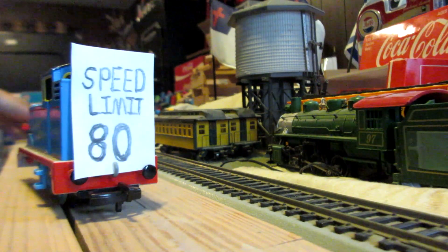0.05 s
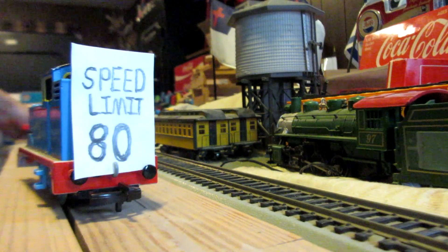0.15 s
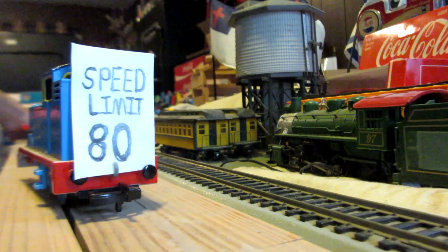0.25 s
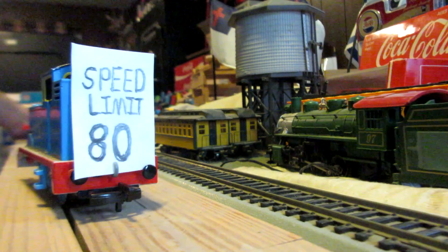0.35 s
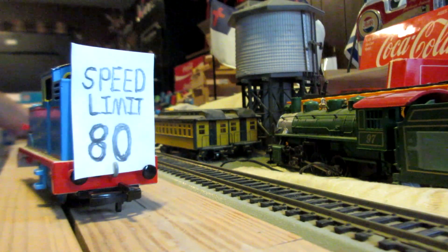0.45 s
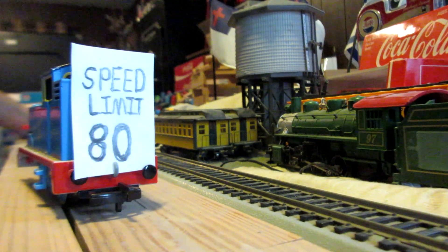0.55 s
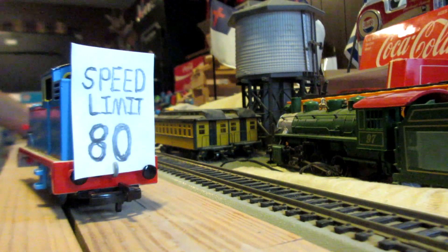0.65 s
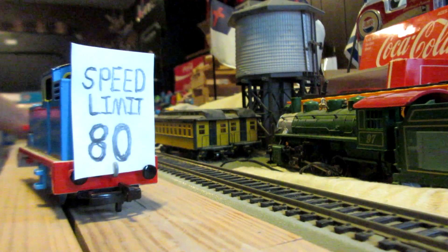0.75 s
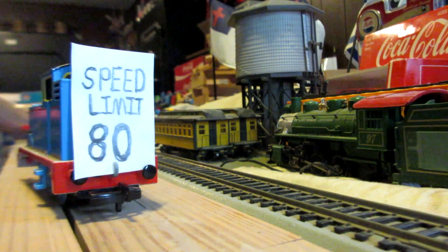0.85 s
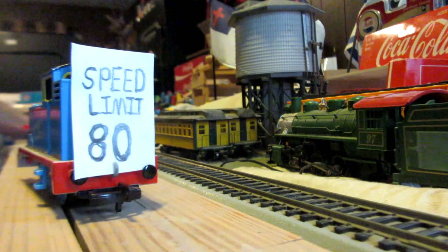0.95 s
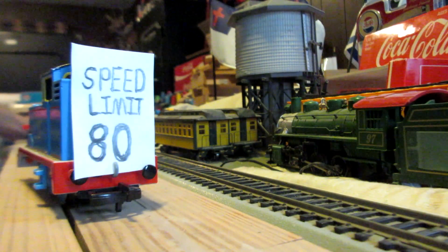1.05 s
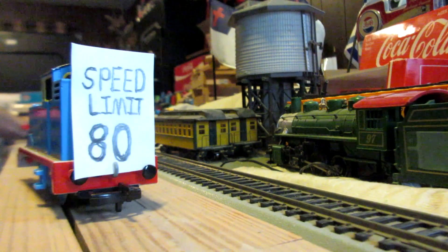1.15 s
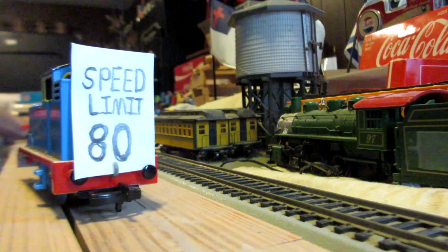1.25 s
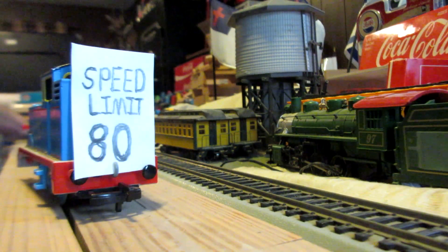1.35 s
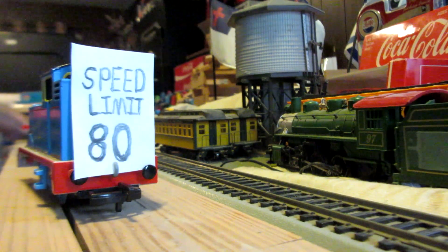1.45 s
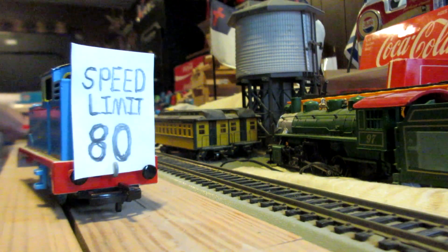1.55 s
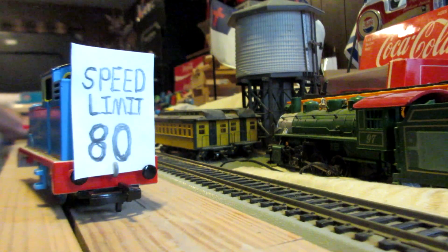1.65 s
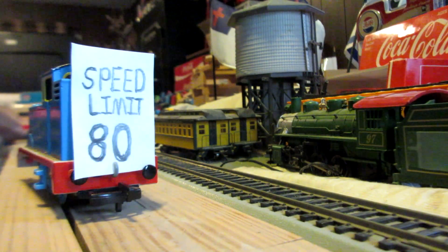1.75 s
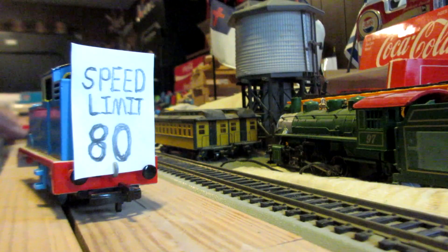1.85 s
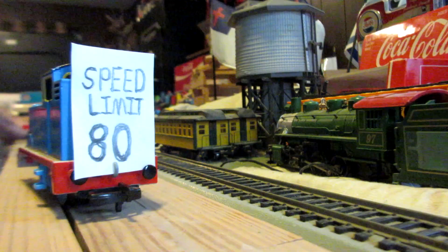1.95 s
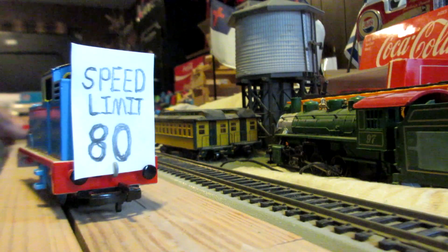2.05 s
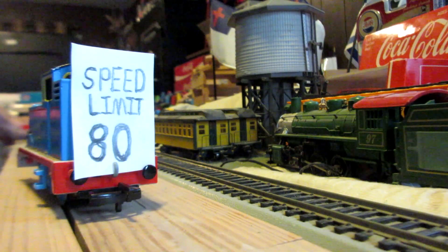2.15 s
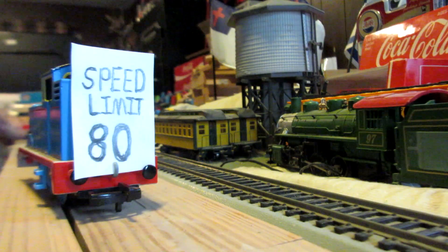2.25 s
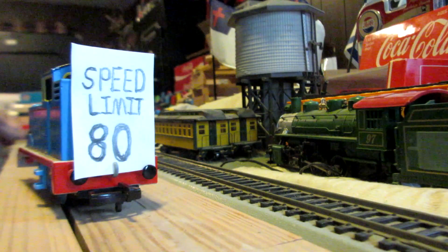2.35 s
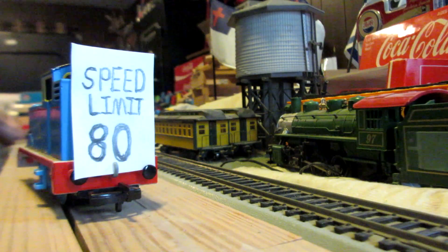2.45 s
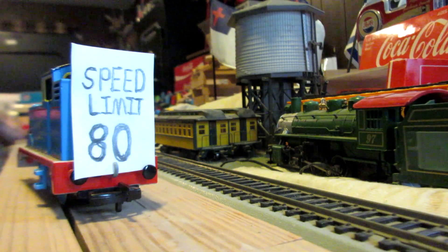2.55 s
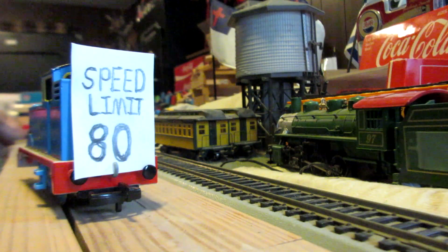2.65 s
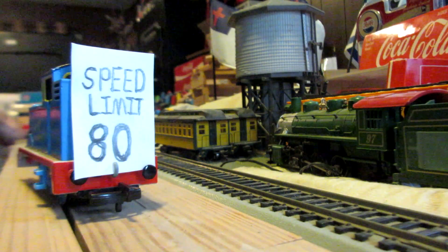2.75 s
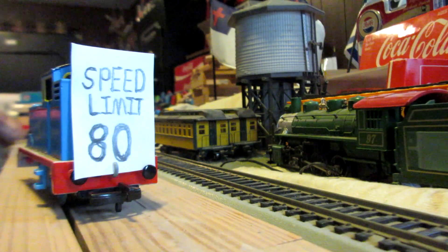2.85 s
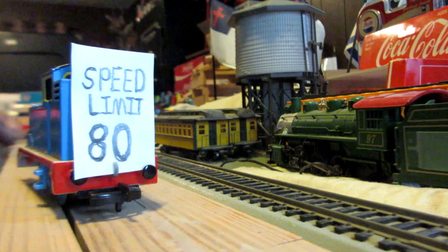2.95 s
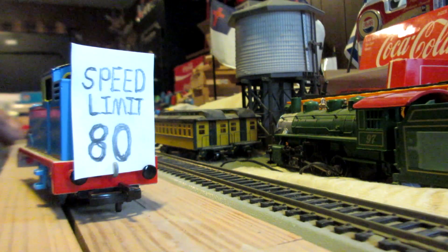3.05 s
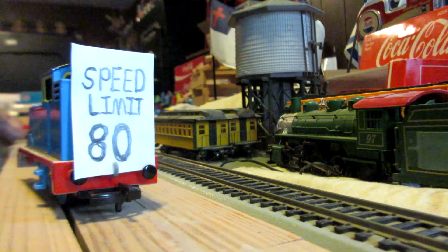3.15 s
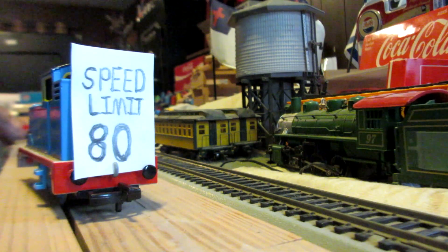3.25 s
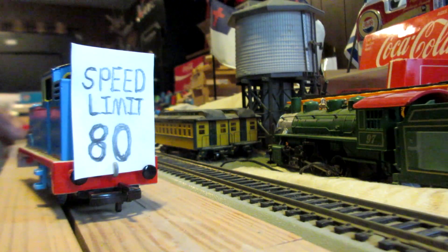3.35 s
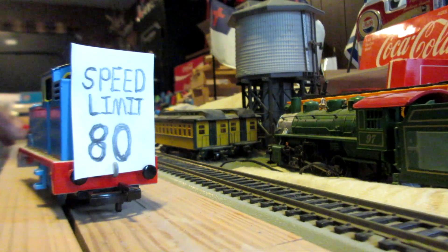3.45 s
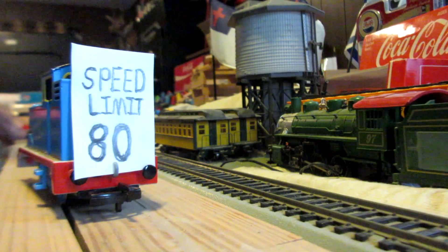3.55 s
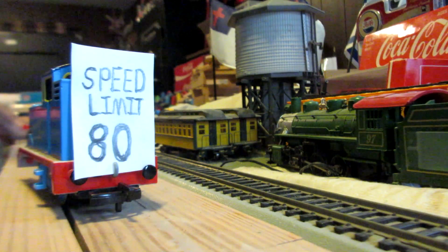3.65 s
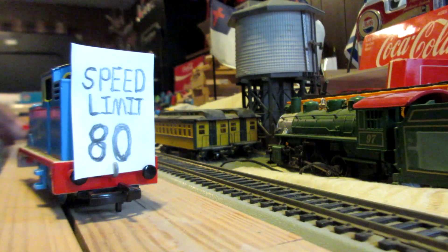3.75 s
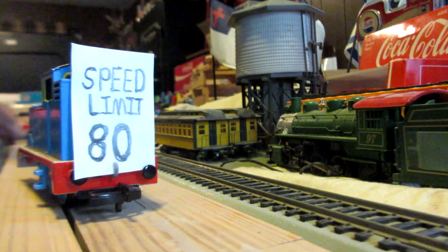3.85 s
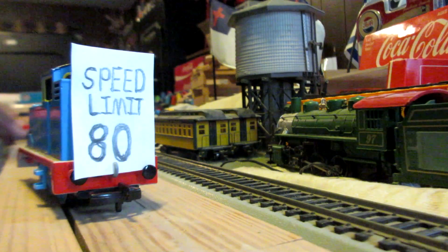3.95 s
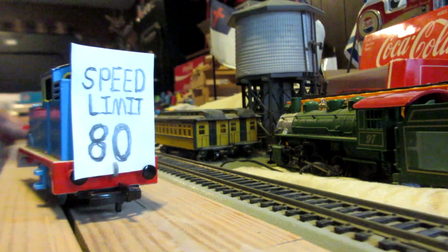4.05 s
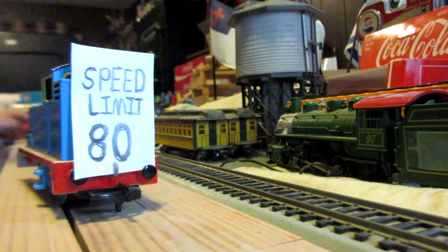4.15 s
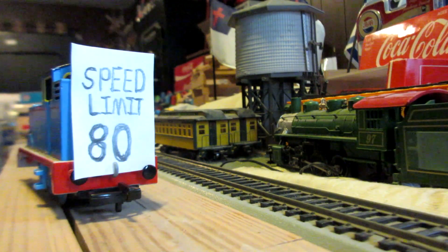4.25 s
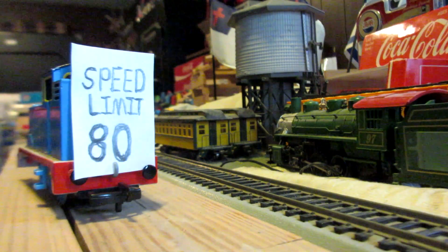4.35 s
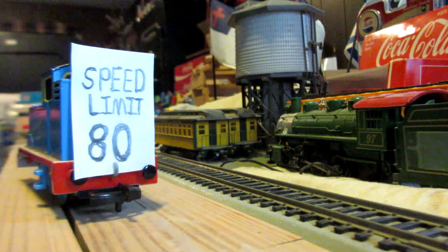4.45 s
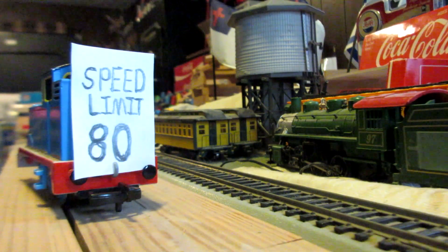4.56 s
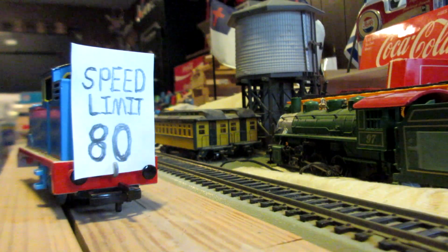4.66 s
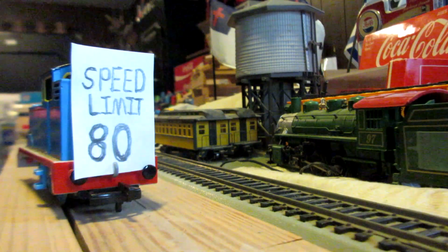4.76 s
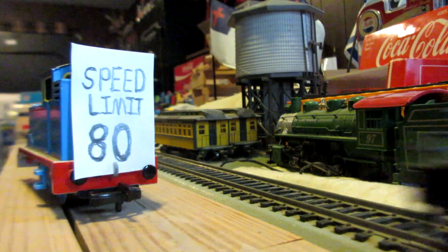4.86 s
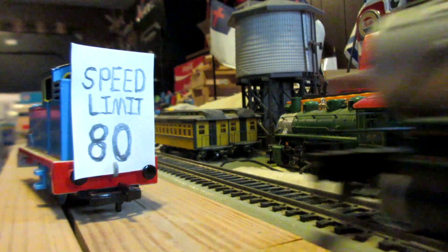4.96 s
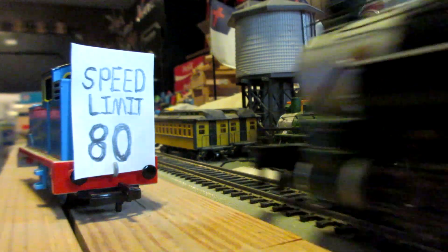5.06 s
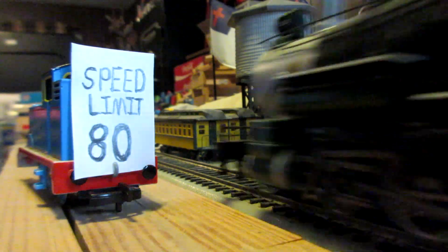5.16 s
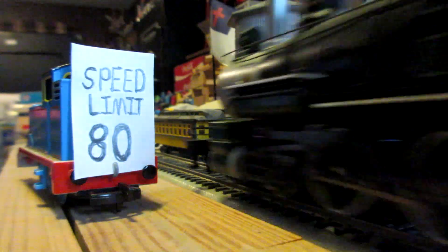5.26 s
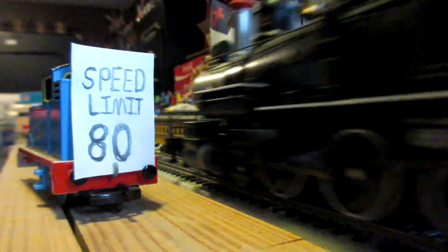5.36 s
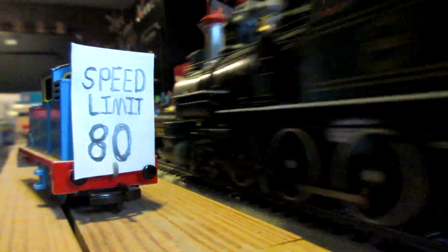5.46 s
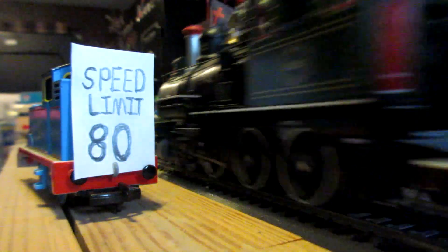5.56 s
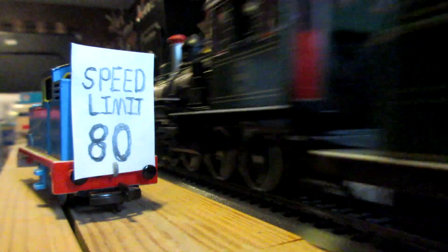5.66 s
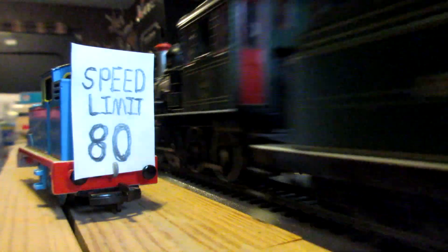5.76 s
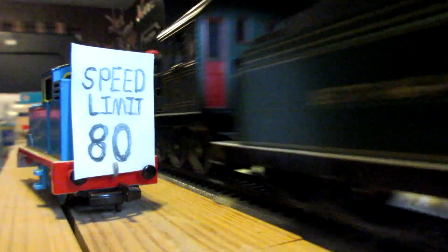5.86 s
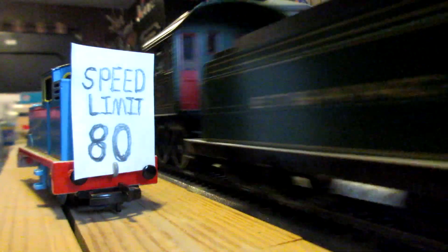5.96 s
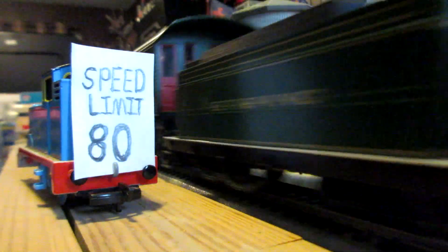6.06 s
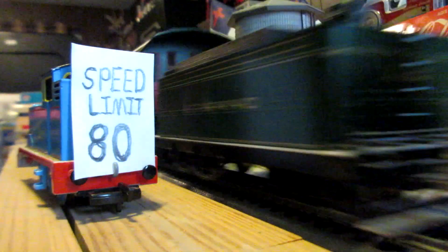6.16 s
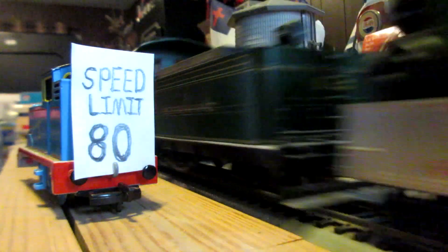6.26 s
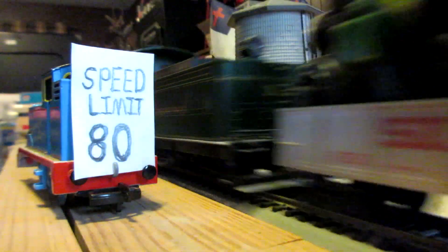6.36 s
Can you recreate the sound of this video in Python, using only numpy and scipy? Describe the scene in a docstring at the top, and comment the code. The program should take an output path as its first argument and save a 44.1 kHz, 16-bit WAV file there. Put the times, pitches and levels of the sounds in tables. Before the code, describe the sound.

A few light knocks and plastic clicks sound over faint room noise as a toy engine is placed on wood. Then a model train comes up the track, faint at first, swelling into a loud metallic rolling noise with irregular clatter, brief ringing wheel rubs and a low rumble from the wooden board. The hiss brightens as it runs right past the microphone in a small room.

```python
"""In a quiet room, a small model engine is set down on a wooden layout board: its knocks excite the
board's modes and its own plastic shell. Then a model locomotive runs up the track and passes close by.
Rough contact between metal wheels and rails makes a roar, a scrape and a hiss, stick-slip friction
makes the wheels sing, and impacts at the rail joints clank. The board, driven by the wheels, rumbles
and booms. Behind it all lie steady room noise and a faint whine."""
import sys
import numpy as np
from scipy import signal
from scipy.fft import rfft, irfft
from scipy.io import wavfile
from scipy.ndimage import uniform_filter1d

SR = 44100
rng = np.random.default_rng(int(sys.argv[2]) if len(sys.argv) > 2 else 0)


def persist_wave(psi):
    """Save psi, clipped to +-1, as 16-bit WAV."""
    counts = np.round(np.clip(psi, -1, 1) * 32767).astype(np.int16)
    wavfile.write(sys.argv[1], SR, np.atleast_2d(counts).T)


N = 282681
TIME = np.arange(N) / SR

# heard loudness of the rolling, which swells, then dips briefly around 5 s: (time [s], level [dB])
HEARD_LEVEL = [(2.35, -59), (2.55, -52), (3.08, -41.5), (3.2, -39), (3.55, -34), (4.17, -28.5),
               (4.4, -23.5), (4.72, -18.5), (4.88, -20), (5.01, -21), (5.05, -22.5), (5.3, -20.5),
               (5.8, -20.5), (6.41, -20.5)]
RUN_START_S, FULL_DB = HEARD_LEVEL[0][0], -21


def rolling():
    """Roughness excitation: tiny contacts shake wheels and rails under a fluttering contact pressure."""
    # spectra of roar, scrape and hiss along the approach: (frequency [Hz], relative level [dB])
    roar_far = [(260, -47.5), (450, -4), (521, -4.5), (566, -5), (692, -2), (793, -2), (1090, -4.5),
                (1500, 0.5), (2070, -5.5), (2310, -7), (2830, -9.5), (4000, -18), (5200, -40), (8800, -120)]
    roar_nearing = [(260, -28), (450, -18), (516, -5.5), (560, -14), (620, -12), (751, -9), (961, -3.5),
                    (1650, 0), (1870, -2), (2440, -3), (2720, -9), (4000, -13.5), (5200, -15.5),
                    (8800, -120)]
    roar_close = [(260, -34), (450, -7), (853, -3), (997, -4.5), (1240, 0), (1660, 2), (2090, 0),
                  (2800, -6), (4000, -11.5), (5200, -22), (8800, -120)]
    scrape_far = [(2200, -16), (3300, 1.5), (4400, -5.5), (5500, -3.5), (6400, -8), (7400, -5), (8500, -16),
                  (12000, -31.5)]
    scrape_close = [(2200, -24), (3400, 3.5), (4200, 5.5), (5000, 1.5), (6200, -1.5), (7400, -14),
                    (9000, -15), (12000, -59)]
    hiss_far = [(5000, -25), (7000, 2), (9000, 2), (10700, -0.5), (12200, -6), (13500, -20.5), (15200, -15)]
    hiss_close = [(5000, -15), (7000, 13.5), (9000, 11.5), (10700, 9), (12200, 8.5), (13500, 5),
                  (15200, 1.5)]
    # the hiss peaks at the driving wheels, then the tender screens it: (time [s], gain [dB])
    hiss_facing = [(4.9, -3.5), (5.45, 2), (5.78, -5.5)]
    # the rails ring ahead of the train and are drowned close by: (time [s], level re the hiss [dB])
    rail_level = [(3.4, -10), (3.95, 1), (4.5, -4), (5.1, -24)]
    far = np.interp(TIME, [3.95, 4.3], [1, 0])
    close = np.interp(TIME, [4.95, 5.3], [0, 1])
    pressure = wander(hz=59.7)
    contact = grit(per_s=900, spread_db=2.0, share=0.33)
    stages = (far, roar_far), (1 - far - close, roar_nearing), (close, roar_close)
    roar = sum(share * coloured(contact, spectrum) for share, spectrum in stages)
    roar *= rolling_gain(FULL_DB, growth=1) * gain_of(-0.83 + 0.45 * pressure)
    friction = .5 * contact + 1.1 * grit(per_s=1300, spread_db=1.5, share=0.58)
    scrape = (1 - close) * coloured(friction, scrape_far) + close * coloured(friction, scrape_close)
    scrape *= rolling_gain(-28, growth=1.34) * gain_of(-3.0 + 1.5 * pressure)
    specks = 0.64 * friction + grit(per_s=300, spread_db=5.5, share=0.28)
    dull = np.interp(TIME, [3.3, 5.2], [1, 0])  # a long path loses the highest hiss
    hiss = dull * coloured(specks, hiss_far) + (1 - dull) * coloured(specks, hiss_close)
    hiss *= gain_of(2.0 + 0.69 * pressure)
    ringing = unit_rms(rail_ring(specks)) * gain_of(level_at(TIME, rail_level))
    hiss_gain = rolling_gain(-39.5, growth=1.22) * gain_of(level_at(TIME, hiss_facing))
    return wheel_rocking(roar + scrape + hiss_gain * (hiss + ringing), depth_db=1.5)


def rolling_gain(db, growth):
    """Power law: a layer fades in, then moves `growth` dB for each dB of the rolling's heard level."""
    fade_in = np.clip((TIME - RUN_START_S) / 0.09, 0, 1)
    return fade_in * gain_of(db + growth * (level_at(TIME, HEARD_LEVEL) - FULL_DB))


def wheel_rocking(x, depth_db):
    """Random modulation: rocking wheels shift their contact points, so narrow bands swell and fade."""
    bands = signal.stft(x, nperseg=1024, noverlap=768)[2]
    patches = uniform_filter1d(rng.standard_normal(bands.shape), size=9, axis=0)
    patches = unit_rms(uniform_filter1d(patches, size=10, axis=1))
    return signal.istft(bands * gain_of(depth_db * patches), nperseg=1024, noverlap=768)[1][:N]


def rail_ring(x):
    """Resonance: the metal rails ring at their modes when x shakes them."""
    # rail modes: (frequency [Hz], bandwidth [Hz], gain [dB])
    modes = [(5230, 280, -13), (7320, 420, 2.5), (8770, 1000, 0), (12170, 600, -7)]
    return sum(gain_of(db) * resonate(x, hz, width) for hz, width, db in modes)


def rail_joints(second_wheel_s=.007, second_wheel_db=-10.5, thump_db=-11.5):
    """Impact excitation: both wheels of an axle strike a joint in turn, and the board thumps."""
    # blows at the joints: (time [s], relative clank level [dB], relative snap level [dB])
    blows = [(2.504, -41.5, -63), (2.938, -34.5, -54.5), (3.077, -41, -66), (3.137, -27, -48.5),
             (3.383, -27, -42), (3.52, -28, -49), (3.716, -27, -49), (3.824, -30.5, -36), (3.993, -24, -42),
             (4.096, -17.5, -32), (4.246, -16.5, -30), (4.345, -22, -35), (4.614, -16.5, -48),
             (4.718, -19, -40), (4.832, -17.5, -49), (5.006, -15, -42), (5.14, -20, -30.5),
             (5.274, -16, -38), (5.722, -14, -33), (5.836, -24, -31.5), (6.033, -18, -29.5),
             (6.127, -15.5, -31), (6.142, -15.5, -33), (6.232, -17, -34), (6.383, -16.5, -44)]
    out, thump = np.zeros(N), board_ring()
    for s, clank_db, snap_db in blows:
        add(out, s, wheel_strike(s, clank_db, snap_db))
        add(out, s + second_wheel_s, gain_of(second_wheel_db) * wheel_strike(s, clank_db, snap_db))
        add(out, s, gain_of(clank_db + thump_db) * thump)
    return out


def wheel_strike(s, clank_db, snap_db, onset_s_per_m=0.00029):
    """Propagation loss: a wheel clanks, snaps and rings the rail; a long path smears and dulls it."""
    # spectra of the blow's low and high parts: (frequency [Hz], relative level [dB])
    clank_spectrum = [(150, -13.5), (700, -2), (1300, 2), (1750, 3), (2600, -4.5), (4200, -9.5),
                      (6000, -18), (12000, -41)]
    snap_spectrum = [(2000, -22), (4000, -8), (5500, -3), (7400, -2), (9000, -1), (11000, -1), (15000, -1)]
    metres = wheel_distance(s)
    smear_s, direct = 0.0016 + 0.0017 * metres, 0.19 / metres
    clank = gain_of(clank_db + 3.0) * burst(smear_s * 1.27, clank_spectrum, impulse=direct)
    top_hz = snap_spectrum[-1][0]
    dulled = [(hz, db - 6.8 * metres * (hz / top_hz) ** 2) for hz, db in snap_spectrum]
    snap = gain_of(snap_db + 9.5) * burst(smear_s * 1.02, dulled, impulse=direct / 2)
    onset = 1 - np.exp(-np.arange(1, len(snap) + 1) / SR / (onset_s_per_m * metres))
    return clank + snap * onset + gain_of(-1.0) * min(metres, 1) * rail_ring(snap)


def wheel_distance(s, speed_m_per_s=1.29, arrival_s=5.24, nearest_m=0.24):
    """Uniform motion: metres to the nearest wheels; after arrival some are always alongside."""
    return np.hypot(nearest_m, speed_m_per_s * max(arrival_s - s, 0))


def clatter(per_s=16, above_rolling_db=1, scatter_db=1.5):
    """Random impacts: wheels and rods knock about as loudly as the rolling is heard."""
    out = np.zeros(N)
    for k in range(int((TIME[-1] - RUN_START_S) * per_s)):
        s = RUN_START_S + (k + rng.random()) / per_s
        db = level_at(s, HEARD_LEVEL) + above_rolling_db + scatter_db * rng.standard_normal()
        add(out, s, wheel_strike(s, clank_db=db, snap_db=db - 22.5))
    return out


def wheel_rubs():
    """Stick-slip friction: each rub excites one wheel resonance, which may glide as the wheel passes."""
    # rubs of flanges and driving wheels:
    # (time [s], duration [s], start frequency [Hz], end frequency [Hz], bandwidth [Hz], level [dB])
    rubs = [(2.604, 0.59, 720, 720, 190, -51), (3.36, 0.61, 2340, 2270, 420, -39),
            (4.02, 0.5, 1500, 1350, 426, -27.5), (4.455, 0.54, 4350, 4240, 420, -34),
            (4.655, 0.43, 4430, 5100, 2780, -28.5), (4.893, 0.15, 1780, 1580, 396, -23),
            (4.998, 0.04, 5200, 5560, 1290, -23), (5.04, .16, 5200, 4900, 1090, -31),
            (5.254, 0.19, 5800, 6030, 600, -34.5), (5.494, 0.69, 4300, 3980, 260, -34),
            (5.665, 0.16, 3200, 2230, 300, -27)]
    out, slips = np.zeros(N), grit(per_s=1300, spread_db=4.5, share=0.72)
    for s, length, start_hz, end_hz, width_hz, db in rubs:
        drive = slips[round(s * SR):][:round(length * SR)]
        song = unit_rms(resonate(drive, np.linspace(start_hz, end_hz, len(drive)), width_hz))
        add(out, s, gain_of(db) * song * signal.windows.tukey(len(drive), .5))
    return out


def board_rumble(loaded_s=3.3, load_db_per_s=17.5):
    """Forced vibration: the board rumbles and booms under the wheels, and sways on its legs."""
    # spectra of the three motions: (frequency [Hz], relative level [dB])
    rumble_spectrum = [(70, -23), (120, 2.5), (165, 3.5), (240, 2), (350, 3.5), (480, 1), (700, -37.5)]
    boom_spectrum = [(30, -25), (50, -3), (76, 13), (100, 8.5), (150, -44)]
    sway_spectrum = [(15, -19), (33, 6), (45, 18), (70, -39)]
    # the rumble is turned down by 5 dB; the sway slowly fades
    turn_down = gain_of(np.interp(TIME, [4.66, 4.82], [0, -5]))
    slow_fade = gain_of(np.interp(TIME, [3.8, 6.1], [0, -10]))
    rumble = coloured(rng.standard_normal(N), rumble_spectrum) * gain_of(wander(hz=30))
    rumble *= rolling_gain(-33, growth=0.7) * turn_down
    boom = gain_of(-44 + 1.8 * wander(hz=6.7)) * coloured(rng.standard_normal(N), boom_spectrum)
    sway = gain_of(-48.5) * slow_fade * coloured(rng.standard_normal(N), sway_spectrum)
    # the deep sounds grow until the train's whole weight is on the board
    load = gain_of(load_db_per_s * np.minimum(TIME - loaded_s, 0))
    return rumble + load * (boom + sway)


def board_drone():
    """Resonance: one noise-driven mode of the board swells and fades as the heavy engine crosses."""
    # the drone: (peak time [s], half duration [s], frequency [Hz], bandwidth [Hz], peak level [dB])
    mode = (4.5, 0.48, 259, 100, -36)
    peak_s, half_s, hz, width, db = mode
    swell = np.exp(-((TIME - peak_s) / half_s) ** 2)
    return gain_of(db) * swell * unit_rms(resonate(rng.standard_normal(N), hz, width))


def board_heaves(hz=78, length_s=0.043):
    """Moving load: the train's weight swells the board's lowest mode for a few cycles."""
    # heaves of the board: (time [s], level [dB])
    heaves = [(3.409, -32.5), (3.517, -25.5), (3.865, -26.5), (4.125, -31), (4.485, -27.5), (4.6, -28),
              (5.299, -30.5), (5.457, -31.5)]
    out, t = np.zeros(N), np.arange(0, length_s, 1 / SR)
    swell = np.sin(np.pi * t / length_s)
    for s, db in heaves:
        add(out, s, gain_of(db) * swell * np.sin(2 * np.pi * hz * rng.uniform(1.0, 1.04) * t))
    return out


def engine_knocks():
    """Free vibration: the small engine and the hand bump the board; the plastic shell clacks and rings."""
    # bumps: (time [s], thump level [dB], hardness [dB/octave], clack level [dB], clack decay [s],
    # shell gain [dB])
    bumps = [(.008, -27.5, -14, -40, 0.017, -66), (.025, -21, 6, -36.5, 0.018, -57),
             (.916, -65, 0, -52, 0.0063, -43), (.921, -35, -5, -35.5, 0.01, -37.5),
             (.937, -30, 0, -44, 0.023, -55), (1.423, -42, 11, -51, 0.033, -70),
             (1.448, -49, -4, -49, 0.03, -49), (1.903, -37.5, 21, -47, .022, -56),
             (2.528, -38, 5, -58, .02, -70)]
    # spectrum of the plastic clack: (frequency [Hz], relative level [dB])
    clack_spectrum = [(200, 5.5), (600, 8), (780, 1), (1000, 4.5), (1150, 3), (1400, -1), (1620, 2),
                      (1850, -0.5), (2600, -3.5), (3250, -6.5), (3600, -7), (6000, -16.5), (14000, -23)]
    # shell modes: (frequency [Hz], bandwidth [Hz], relative level [dB])
    shell_modes = [(1076, 45, 2.5), (1580, 45, -5), (3220, 57, -3.5)]
    out, t = np.zeros(N), np.arange(SR // 8) / SR
    shell = sum(gain_of(db) * np.exp(-np.pi * width * t) * np.sin(2 * np.pi * hz * t)
                for hz, width, db in shell_modes)
    for s, thump_db, hardness, clack_db, decay_s, shell_db in bumps:
        add(out, s, gain_of(thump_db) * board_ring(hardness))
        add(out, s, gain_of(clack_db) * burst(decay_s, clack_spectrum))
        add(out, s, gain_of(shell_db) * shell)
    return out


def board_ring(db_per_octave=0, contact_s=0.0033, size=12000):
    """Modal superposition: the board's response to a soft-edged blow, tilted by its hardness; peak 1."""
    # board modes: (frequency [Hz], relative level [dB], time to decay by 60 dB [s])
    modes = [(71.6, -21, 0.16), (116.7, -1.5, 0.11), (168.5, -5, 0.13), (235, 1, 0.17), (295, 7.5, 0.05),
             (333, -5, 0.069), (410, -6, 0.13), (630, -12, 0.066)]
    t = np.arange(size) / SR
    ring = sum(gain_of(db + db_per_octave * np.log2(hz) - 60 * t / t60) * np.cos(2 * np.pi * hz * t)
               for hz, db, t60 in modes)
    ring = np.convolve(ring, np.hanning(round(contact_s * SR) + 3))
    return ring / abs(ring).max()


def room_reflections(x, t60=0.32, dull_hz=6000, per_s=2000, size=16000):
    """Reverberation: a small furnished room returns sparse echoes, duller than the direct sound."""
    t = np.arange(size) / SR
    echoes = rng.choice([-1, 1], size) * (rng.random(size) < per_s / SR)
    decay = (t > .004) * gain_of(-60 * t / t60)
    tail = signal.lfilter([1], [1, -np.exp(-2 * np.pi * dull_hz / SR)], echoes * decay)
    return signal.fftconvolve(x, tail / np.linalg.norm(tail))[:N]


def room_noise(noise_db=-51.5):
    """Ambient noise: a steady broadband floor with a thin, slightly wavering whine."""
    # spectrum of the room noise: (frequency [Hz], relative level [dB])
    spectrum = [(15, -47), (25, 2), (45, 0), (80, -1), (128, -2), (190, -5), (286, -3), (427, -7.5),
                (637, -10), (800, -7.5), (1090, -12), (1960, -13), (2180, -16.5), (8100, -25), (15000, -33)]
    # tones of the whine: (frequency [Hz], rms level [dB])
    tones = [(898, -71), (1896, -69.5)]
    whine = np.zeros(N)
    for hz, db in tones:
        wavering_hz = hz * (1 + 0.00034 * wander(hz=12))
        whine += gain_of(db) * np.sqrt(2) * np.sin(2 * np.pi * np.cumsum(wavering_hz) / SR)
    return gain_of(noise_db) * coloured(rng.standard_normal(N), spectrum) + whine


def grit(per_s, spread_db, share):
    """Shot noise of metal on metal: countless tiny contacts, `share` of the power in larger specks."""
    sizes = gain_of(spread_db * np.minimum(rng.exponential(1, N), 4))
    specks = sizes * rng.choice([-1, 1], N) * (rng.random(N) < per_s / SR)
    return np.sqrt(share) * unit_rms(specks) + np.sqrt(1 - share) * rng.standard_normal(N)


def burst(decay_s, spectrum, impulse=0., size=8000):
    """Exponential decay: one contact and its dying chatter, filtered by a body."""
    t = np.arange(size) / SR
    chatter = rng.standard_normal(size) * np.exp(-t / decay_s)
    chatter[0] += impulse * np.linalg.norm(chatter)
    return coloured(chatter, spectrum) * np.sqrt(decay_s * SR / (2 * size))


def coloured(x, spectrum, size=4096):
    """Minimum-phase filtering: x passes through a body with the given spectrum; rms 1."""
    hz, db = np.transpose(spectrum)
    bin_hz = abs(np.fft.fftfreq(size, 1 / SR))
    log_gain = np.log(gain_of(np.interp(np.log(bin_hz + 1), np.log(hz + 1), db)))
    response = np.fft.ifft(np.exp(np.conj(signal.hilbert(log_gain)))).real
    return unit_rms(signal.fftconvolve(x, response[:size // 2])[:len(x)])


def resonate(x, hz, width_hz):
    """Double-pole resonance of gain 1 that can follow a gliding frequency."""
    carrier = np.exp(2j * np.pi * np.cumsum(hz * np.ones(len(x))) / SR)
    pole = np.exp(-np.pi * width_hz / SR / .64)
    envelope = signal.lfilter([(1 - pole) ** 2], [1, -2 * pole, pole * pole], x / carrier)
    return 2 * (carrier * envelope).real


def wander(hz):
    """Band-limited random fluctuation up to about the given rate; rms 1."""
    f = np.fft.rfftfreq(N, 1 / SR)
    band = np.exp(-(f / hz) ** 2) * f / (f + hz / 10)
    return unit_rms(irfft(rfft(rng.standard_normal(N)) * band, N))


def level_at(s, curve):
    """Linear interpolation of a (time [s], level [dB]) curve."""
    return np.interp(s, *np.transpose(curve))


def gain_of(db):
    """Decibels to amplitude ratio."""
    return 10 ** (np.asarray(db) / 20)


def unit_rms(x):
    """Normalisation to an rms of 1."""
    return x / np.sqrt(np.mean(x ** 2) + 1e-20)


def add(mix, s, sound):
    """Superposition of a sound on the mix at time s."""
    part = mix[max(round(s * SR), 0):][:len(sound)]
    part += sound[:len(part)]


def scene():
    """Superposition of train, knocks and room noise; only the impacts reverberate."""
    sustained = rolling() + board_rumble() + board_drone() + wheel_rubs() + board_heaves() + room_noise()
    impacts = engine_knocks() + rail_joints() + clatter()
    return (impacts + gain_of(-9.5) * room_reflections(impacts) + sustained)[None]


def record(dry):
    """Band limiting: a steep low-pass removes the highest treble."""
    low_pass = signal.firwin(511, cutoff=15200, window=("kaiser", 9), fs=SR)
    return signal.oaconvolve(dry, low_pass[None], "same")


dry = scene()
out = record(dry)
persist_wave(out)
```